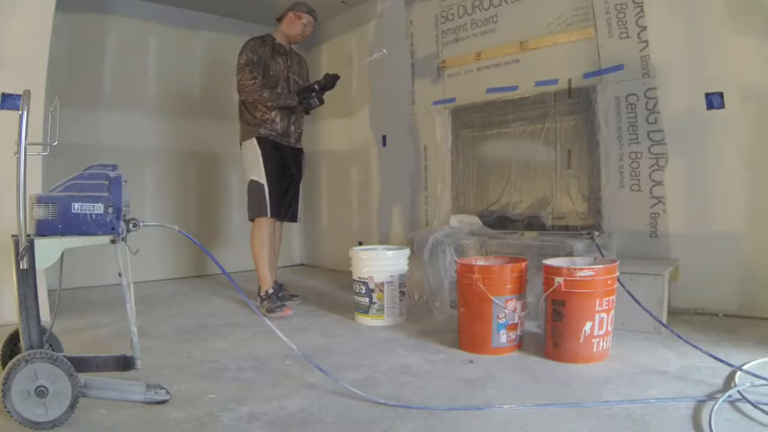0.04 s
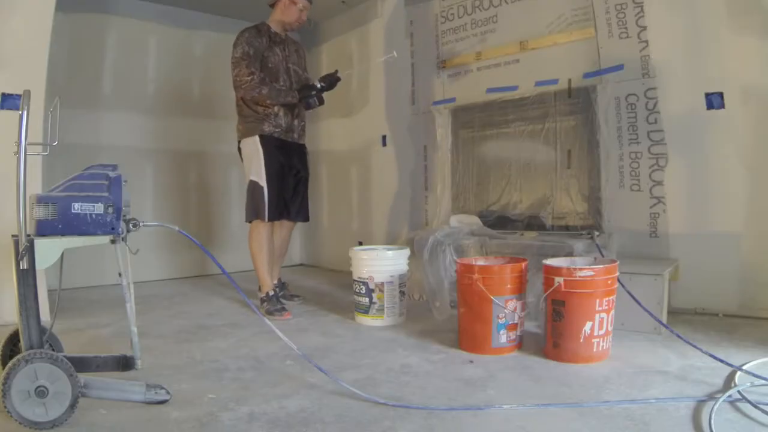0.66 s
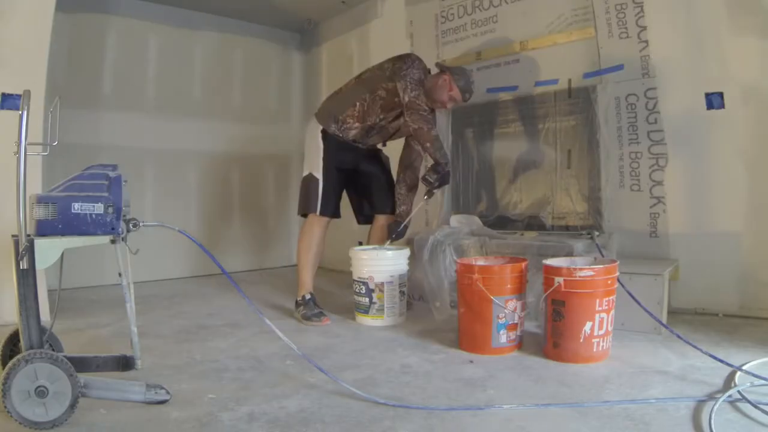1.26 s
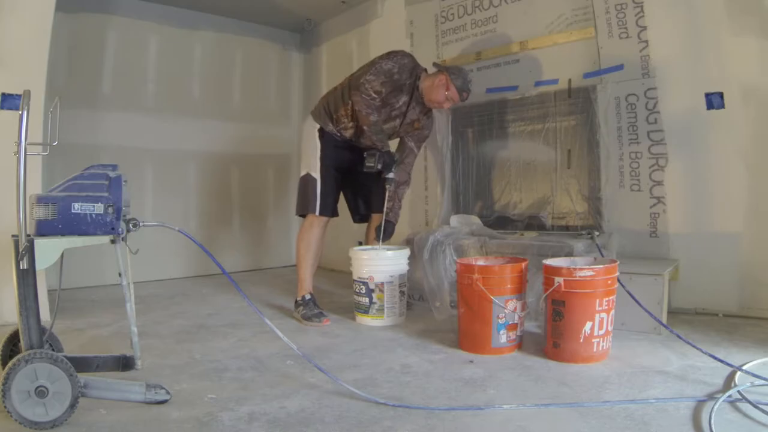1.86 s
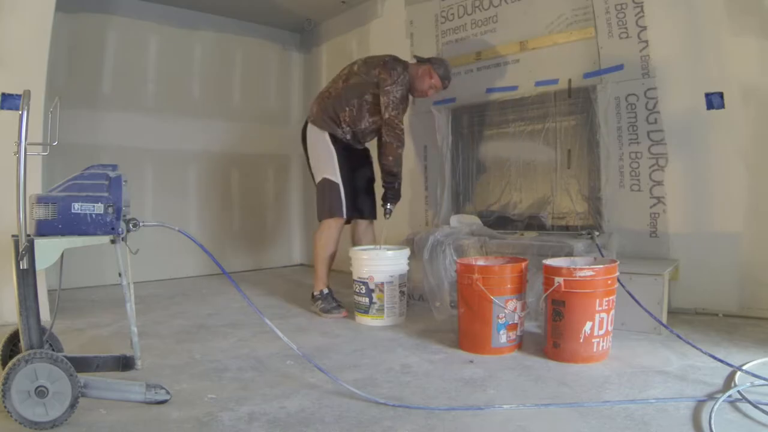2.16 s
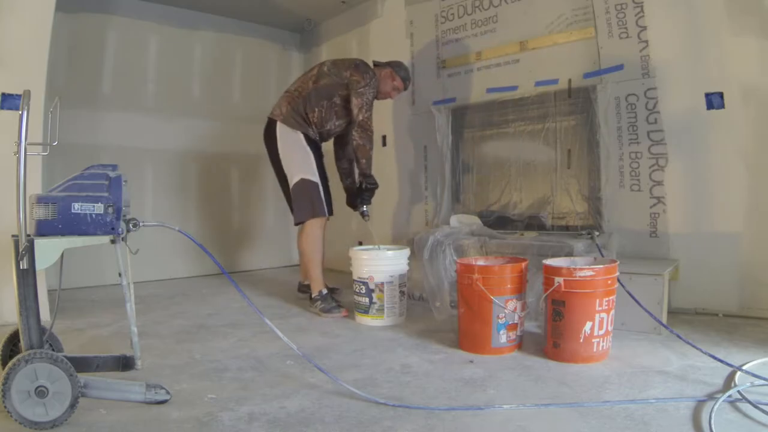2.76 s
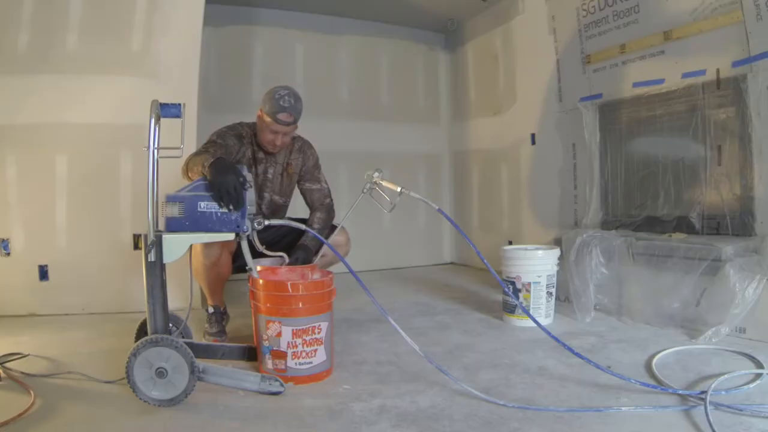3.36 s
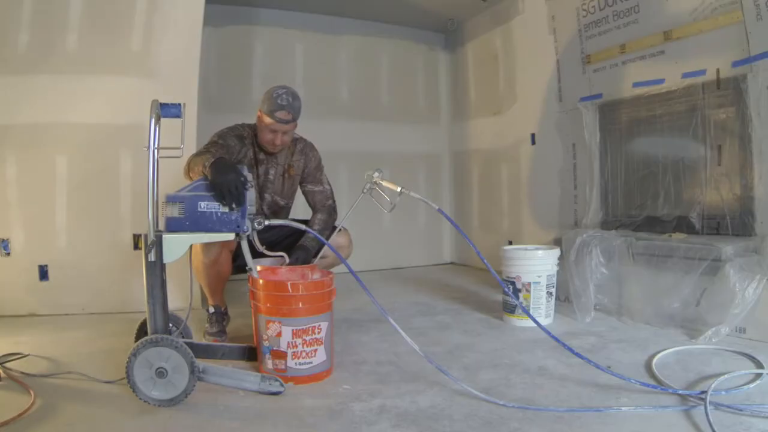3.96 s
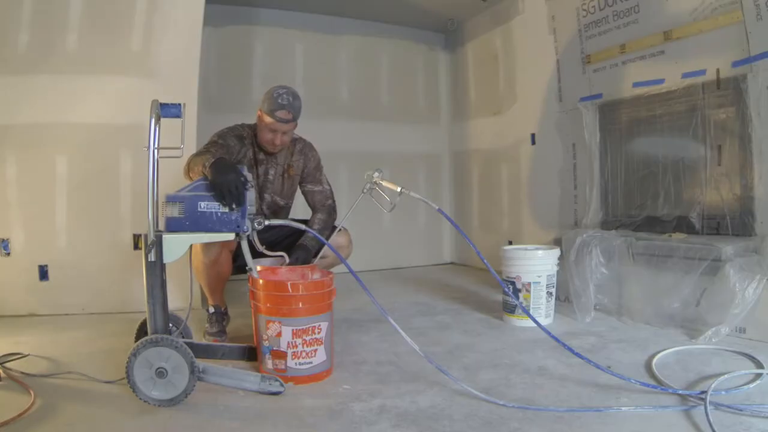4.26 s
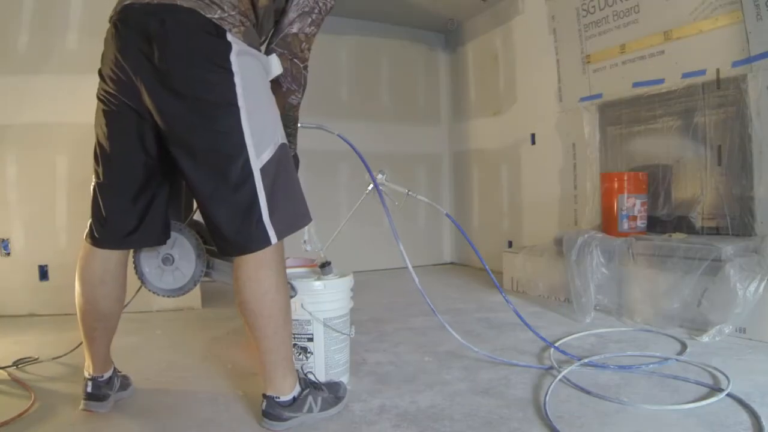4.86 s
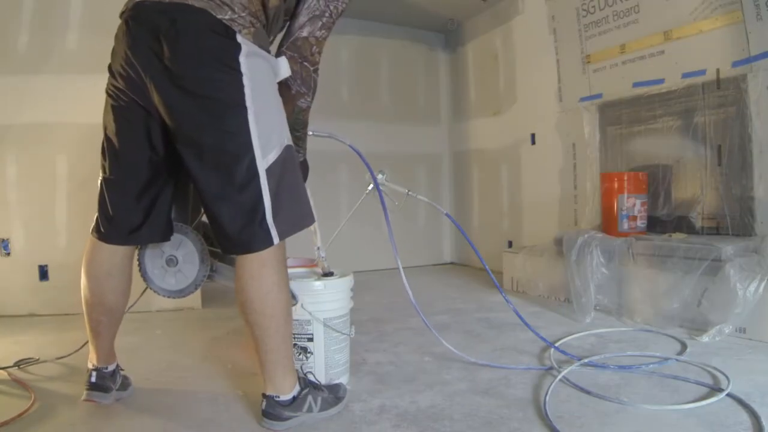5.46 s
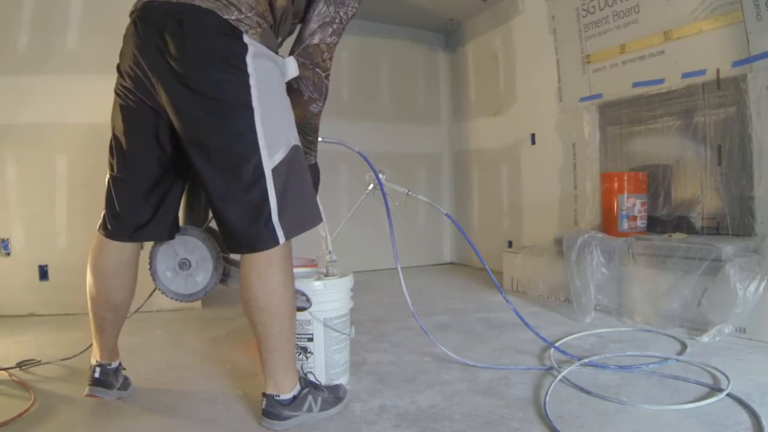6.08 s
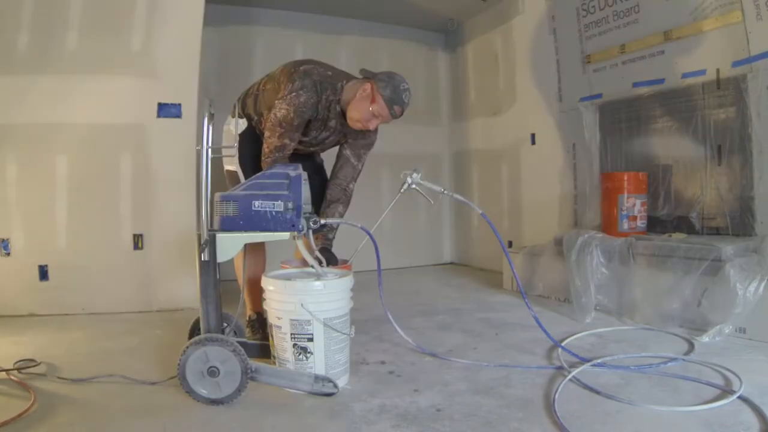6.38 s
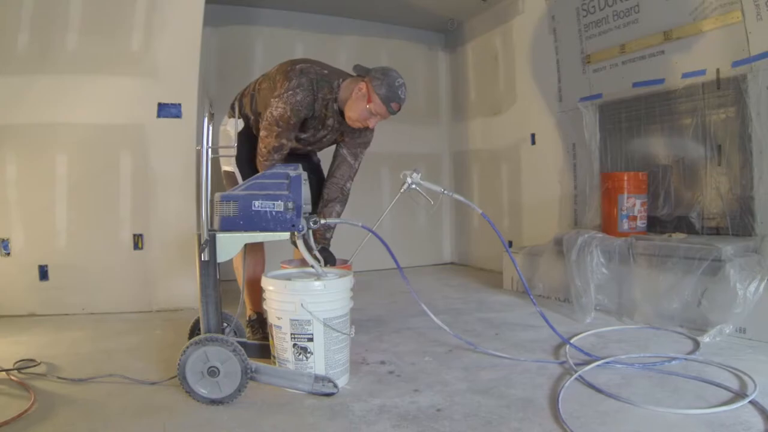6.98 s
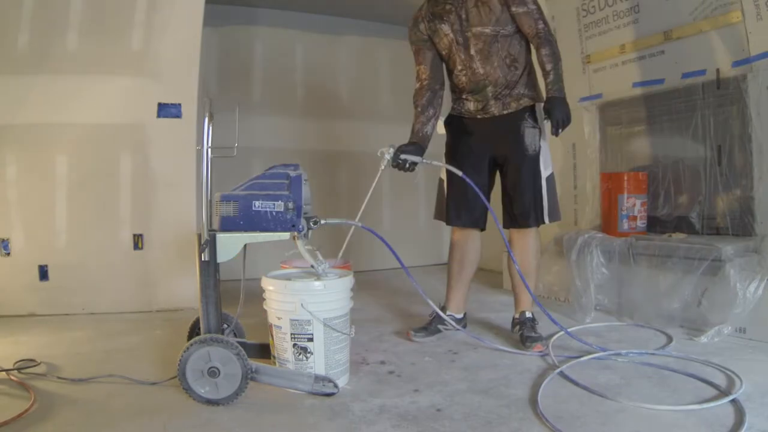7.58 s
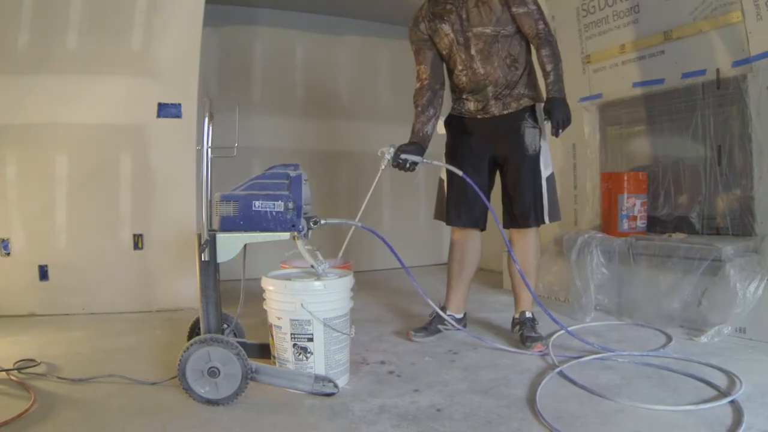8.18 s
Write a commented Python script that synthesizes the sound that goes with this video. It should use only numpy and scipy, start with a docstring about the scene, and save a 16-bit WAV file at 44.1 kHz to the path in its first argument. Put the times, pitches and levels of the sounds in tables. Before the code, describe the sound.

In a bare, echoing basement, a metal spray gun gives a gritty squeak and a sharp snap. Liquid spurts drum and splash into a plastic bucket, turning into a high whistle with hiss. An electric pump motor spins up and cuts off. The bucket scrapes and knocks on concrete. The motor returns with a falling gear whine, then crawls on unevenly. The microphone picks up clear room reflections.

```python
"""A metal spray gun clicks, squeaks and snaps in a bare basement: an airless paint sprayer is being
flushed, in short scenes that cut into one another. The jet drums and splashes in a plastic bucket and
whistles in the tip's orifice. The pump motor spins up, its brushes and gears rattling the casing. The
bucket is shoved and knocked about. Then rising pressure drags the motor down with a falling gear whine,
the power drops, and the motor crawls on."""
import sys
import numpy as np
from scipy import signal
from scipy.fft import rfft, irfft, next_fast_len
from scipy.io import wavfile

SR = 44100
rng = np.random.default_rng(int(sys.argv[2]) if len(sys.argv) > 2 else 0)


def wav_record(signal):
    """Record a signal, one row per channel, as 16-bit PCM in the file named by sys.argv[1]."""
    frames = np.transpose(np.atleast_2d(signal))
    bounded = np.clip(frames, -1, 1)
    # unit amplitude maps onto the largest positive 16-bit level
    quanta = np.round(bounded * 32767).astype(np.int16)
    wavfile.write(sys.argv[1], SR, quanta)


N = 362781
TIME = np.arange(N) / SR

# Start and end of each scene, in seconds.
GUN_SCENE, DRUM_SCENE, JET_SCENE = (0, 1.187), (1.44, 3.197), (2.097, 3.197)
SPIN_UP, BUCKET_SCENE, SLOW_DOWN, CRAWL = (3.556, 4.631), (4.631, 6.27), (6.252, 7.478), (7.478, 8.3)


def from_db(db):
    """Decibels to gain."""
    return np.exp(np.asarray(db) * (np.log(10) / 20))


def rms_one(x):
    """Scale to unit rms."""
    return x / np.sqrt(np.mean(x ** 2) + 1e-20)


def in_time(points):
    """A curve of (seconds, value) points, read at every sample."""
    return np.interp(TIME, *np.transpose(points))


def at_hz(points, hz):
    """Read a table on a log-frequency axis."""
    f, value = np.transpose(points)
    return np.interp(np.log(np.maximum(hz, 1)), np.log(f), value)


def phase_of(hz):
    """Running phase of a moving pitch, in radians."""
    return 2 * np.pi * np.cumsum(hz) / SR


def during(span, fade=0.001):
    """One inside a scene, zero outside."""
    return np.clip((TIME - span[0]) / fade, 0, 1) * np.clip((span[1] - TIME) / fade + 1, 0, 1)


def swell(start, rise, hold, db, fall_db_per_s):
    """Gain of one gesture: it rises, holds and dies away."""
    age = TIME - start
    attack = np.clip(age / max(rise, 1 / SR), 0, 1)
    return attack * from_db(db - fall_db_per_s * np.maximum(age - rise - hold, 0))


def together(gains):
    """Gains of overlapping gestures add in power."""
    return np.sqrt(sum(gain ** 2 for gain in gains))


def drift(rate):
    """Smooth random wander with spread 1 that changes about rate times a second."""
    step, settle = 40, 2000
    r = np.exp(-2 * np.pi * rate * step / SR)
    noise = rng.standard_normal(N // step + settle + 2)
    slow = signal.lfilter([1], [1, -2 * r, r * r], noise)[settle:]
    return np.interp(np.arange(N) / step, np.arange(len(slow)), rms_one(slow))


def shaped(x, spectrum, modes=()):
    """Filter by a broad tone curve with resonant humps."""
    size = next_fast_len(len(x))
    hz = np.arange(size // 2 + 1) * SR / size
    humps = sum(boost / (1 + (2 * (hz - f) / width) ** 2) for f, width, boost in modes)
    return irfft(rfft(x, size) * from_db(at_hz(spectrum, hz) + humps), size)[:len(x)]


def colour(x, spectrum, modes=()):
    """A shaped sound at unit rms."""
    return rms_one(shaped(x, spectrum, modes))


def band(x, low, high):
    """One band of a sound at unit rms."""
    return rms_one(signal.sosfilt(signal.butter(4, [low, high], "band", fs=SR, output="sos"), x))


def grains(per_s, spread_db):
    """Random tiny impacts of uneven size, at unit rms."""
    sizes = from_db(spread_db * np.minimum(rng.exponential(1, N), 4)) * rng.choice([-1, 1], N)
    return rms_one(sizes * (rng.random(N) < per_s / SR))


def taps(events, column=1):
    """One impulse for each event row, as strong as the dB in the chosen column."""
    out = np.zeros(N)
    for row in events:
        out[round(row[0] * SR)] = from_db(row[column])
    return out


def ring(x, modes):
    """Strike a set of decaying modes."""
    out = np.zeros(N)
    for hz, db, t60 in modes:
        r, w = from_db(-60 / (t60 * SR)), 2 * np.pi * hz / SR
        out += signal.lfilter([0, from_db(db) * np.sin(w)], [1, -2 * r * np.cos(w), r * r], x + 1e-18)
    return out


def basement(x, wet_db):
    """Direct sound plus a dense tail off concrete and plasterboard; the treble dies first."""
    # The room's decay. Each row: frequency in Hz, T60 in seconds.
    decay = [(200, 0.97), (1500, 1.0), (3200, 0.77), (6400, 0.71), (8500, 0.44), (11000, 0.37)]
    t, edges, tail = TIME[:SR], np.geomspace(60, 18000, 13), 0
    for low, high in zip(edges, edges[1:]):
        bandpass = signal.butter(2, [low, high], "band", fs=SR, output="sos")
        noise = signal.sosfilt(bandpass, rng.standard_normal(SR))
        tail = tail + noise * from_db(-60 * t / at_hz(decay, np.sqrt(low * high)))
    tail = rms_one(tail * np.minimum(t / 0.0072, 1)) / np.sqrt(SR)
    return x + from_db(wet_db) * signal.fftconvolve(x, tail)[:N]


def room_tone(level_db=-53.5):
    """The still basement: a faint, bass-heavy bed of noise."""
    # Tone of the air. Each row: frequency in Hz, relative level in dB.
    air_colour = [(12, -44), (20, -15.5), (76, -5), (153, -22.5), (175, -18), (266, -21.5), (298, -18.5),
                  (333, -24), (427, -22), (597, -22.5), (705, -20), (1130, -29), (11700, -47.5),
                  (14300, -47), (15500, -78)]
    return from_db(level_db) * colour(rng.standard_normal(N), air_colour)


def faint_noise_and_gun_slide(squeak_hz=4490, climb_hz=1200, climb_s=0.042, main_slide_s=0.539, squeak_db=-8):
    """A brief faint low noise, then metal slides on metal; its gritty squeak climbs as the main slide begins."""
    # A brief faint low noise at the very start, then the slides of the gun's parts. Each row: start in seconds,
    # hold in seconds, level in dB.
    gestures = [(0, 0.03, -52.5), (0.066, 0.065, -57.5), (0.52, .02, -52), (0.539, 0.061, -34),
                (0.6, .07, -32), (1.15, 0.033, -48)]
    # Tone of the grit. Each row: frequency in Hz, relative level in dB.
    grit_colour = [(120, -45.5), (200, -40), (378, -20), (462, -16.5), (1400, -2), (1620, -4.5), (2020, -2),
                   (2850, -9.5), (4100, -11.5), (13900, -29.5), (15500, -43)]
    envelope = together(swell(s, 0.0033, hold, db, fall_db_per_s=898) for s, hold, db in gestures)
    pitch = squeak_hz - climb_hz * np.exp(-np.maximum(TIME - main_slide_s, 0) / climb_s)
    squeak = from_db(squeak_db) * np.sin(phase_of(pitch * (1 + 0.0064 * drift(180))))
    grit = colour(grains(3000, 2), grit_colour)
    return basement(envelope * (grit + squeak), wet_db=-6)


def gun_clicks(crack_db=-8, crack_t60=0.071, snap_db=24):
    """Metal parts snap home; each contact is a short crack that sets the room ringing."""
    # Clicks of gun, switch and fittings. Each row: time in seconds, hit and spring strengths in dB.
    clicks = [(0.2297, -37.5, -41.5), (0.5442, -42, -48), (0.621, -23.5, -31.5), (0.6747, -8, -29.5),
              (3.5578, -24, -50), (5.6654, -29.5, -40.5), (7.481, -30, -34.5)]
    # Tone of a click. Each row: frequency in Hz, relative level in dB.
    click_colour = [(120, -41), (200, -39.5), (554, -20.5), (783, -21.5), (890, -13), (1620, -12.5),
                    (2130, -6.5), (4920, -15.5), (6020, -11), (12200, -18.5), (15500, -24)]
    # The gun body rings on, the trigger spring only clacks.
    # Each row: frequency in Hz, gain in dB, T60 in seconds.
    body_modes = [(2074, -19.5, 1), (2110, -35.5, .7), (2390, -28, .55)]
    spring_modes = [(3330, 4.5, 0.024), (3640, 8.5, 0.0065), (4300, 1, .008)]
    t, hits = TIME[:SR // 4], taps(clicks)
    crack = colour(rng.standard_normal(len(t)), click_colour) * from_db(crack_db - 60 * t / crack_t60)
    snaps = from_db(snap_db) * shaped(hits, click_colour)
    echoes = basement(snaps, wet_db=11) - snaps
    clacks = basement(ring(taps(clicks, column=2), spring_modes), wet_db=4)
    return signal.fftconvolve(hits, crack)[:N] + echoes + clacks + ring(hits, body_modes)


def jet_in_bucket(flutter_hz=32.43, churn=0.55):
    """The jet flutters as it digs into the liquid and beats on the bucket; drops splash on the wall."""
    # Bursts of the jet. Each row: start, rise and hold in seconds, drumming and splash levels in dB.
    bursts = [(1.442, .03, .01, -37, -42), (1.488, .005, 0.048, -25, -29.5), (1.62, 0.027, 0.049, -26, -41),
              (1.982, .006, 0.028, -36.5, -41), (2.094, 0.0026, .38, -22, -31)]
    # Tone of the drumming and of the splash. Each row: frequency in Hz, relative level in dB.
    drum_colour = [(70, -49), (100, -34), (145, -11), (220, -15), (290, -14), (380, -7), (470, -8.5),
                   (620, -18)]
    splash_colour = [(350, -56), (600, 4.5), (696, -9.5), (785, 0.5), (974, -3), (1400, -7.5), (1790, -16),
                     (7960, -42.5), (15000, -50)]
    # Resonances of the bucket with liquid in it. Each row: frequency in Hz, width in Hz, boost in dB.
    bucket_modes = [(130, 12, 8), (162, 14, 10), (182, 17, 4), (267, 19, 15), (331.3, 15, 12),
                    (357, 17, 11), (397.3, 17, 15.5), (836, 26, 6), (940, 53, -9), (1470, 180, 4.5)]
    drumming = together(swell(s, rise, hold, db, fall_db_per_s=73.5) for s, rise, hold, db, _ in bursts)
    splashing = together(swell(s, rise, hold, db, fall_db_per_s=54.5) for s, rise, hold, _, db in bursts)
    cycles = np.cumsum(flutter_hz * (1 + 0.039 * drift(12))) / SR
    count = np.floor(cycles - np.interp(JET_SCENE[0], TIME, cycles))   # a beat as the jet opens fully
    beats = rms_one(np.diff(count, prepend=count[0]) * from_db(2 * drift(35)))
    turbulence = churn * grains(970, 3.1)
    body = colour(basement(beats + turbulence, wet_db=0.5), drum_colour, bucket_modes)
    drops = grains(1600, 0.84) + 0.48 * beats
    splash = colour(basement(drops, wet_db=-0.5), splash_colour, bucket_modes)
    return (drumming * band(body, 89, 690) + splashing * band(splash, 590, 15000)) * during(DRUM_SCENE)


def spray_tip(whistle_hz=3335, rise_hz_per_s=24, flutter_hz=208, flutter_depth=0.43,
              faint_db=-36.5, side_tone_db=-50, hiss_db=-35.5):
    """Fluid whistles in the orifice, its fast flutter adds side tones, and the fan of drops hisses."""
    # The faint whistle catches fully. Each row: start in seconds, hold in seconds, level in dB.
    catches = [(2.067, 0.074, -29.5), (2.485, 0.028, -37), (2.65, .05, -33), (2.784, 0.095, -31.5)]
    # Steady tones of the pressurised gun and hose. Each row: frequency in Hz, level in dB.
    hose_tones = [(318, -58), (2202, -49), (4385, -63)]
    # Tone of the hiss. Each row: frequency in Hz, relative level in dB.
    hiss_colour = [(240, -52), (400, -20), (503, -22), (873, -12), (1690, -10.5), (2250, -10),
                   (2630, -11.5), (3250, -4), (4160, -10), (6000, -17.5), (6780, -14), (13700, -32.5),
                   (15500, -38)]
    pitch = whistle_hz + rise_hz_per_s * (TIME - JET_SCENE[0])
    phase = phase_of(pitch * (1 + 0.00146 * drift(50)))
    flutter = phase_of(flutter_hz * (1 + 0.018 * drift(12.6)))
    harmonics = np.sin(phase) + from_db(-16) * np.sin(2 * phase) + from_db(-28) * np.sin(3 * phase)
    tone = rms_one(basement(harmonics * (1 + flutter_depth * np.sin(flutter)), wet_db=-4))
    surges = [swell(s, 0.011, hold, db, fall_db_per_s=99) for s, hold, db in catches]
    whistle = together(surges + [from_db(faint_db)]) * tone
    lower_side_tone = from_db(side_tone_db) * np.cos(phase - flutter)
    hose = 0
    for hz, db in hose_tones:
        amplitude = np.sqrt(2) * from_db(db + 2 * drift(6.8))
        hose = hose + amplitude * np.sin(2 * np.pi * hz * TIME + 0.71 * drift(3))
    hiss = from_db(hiss_db) * colour(basement(grains(15000, 3.1), wet_db=-2.5), hiss_colour)
    return (whistle + lower_side_tone + hose + hiss) * during(JET_SCENE)


def pump(tooth_hz, noise_law, spectrum, modes, gear_db, octave_db, commutator_db, buzz_db,
         rattle_db, flare, wobble, coasting_s=0):
    """Brushes and gears rattle the casing over the fan's rush; noise, buzz and whine follow the speed."""
    # Fade rates once the power drops, in dB per second: rumble, casing, hiss.
    coast_fall = (28, 58, 81)
    # Buzz of the reduction shaft. Each row: multiple of its speed, relative level in dB.
    shaft_partials = [(3, -11), (5, -8), (6, -6.5), (10, 2), (15, -2), (16, 3)]
    # Gearbox resonances. Each row: frequency in Hz, width in Hz, boost in dB at a flare of 1.
    gearbox_modes = [(1250, 150, 5.5), (2370, 130, 6), (2660, 170, 8), (2950, 270, 12.5), (4380, 110, 2),
                     (4730, 130, 15.5), (5250, 250, 8.5), (6150, 350, 7)]
    gear_teeth, commutator_bars, shaft_ratio = 24, 32, 0.311
    working_hz, judder_hz = 3000, 1450   # tooth rates; below the second the whine breaks up
    octaves = np.log2(tooth_hz / working_hz)
    levels = [db + slope * octaves - fall * coasting_s
              for (db, slope), fall in zip(noise_law, coast_fall)]
    rotor = phase_of(tooth_hz * (1 + 0.00286 * drift(63))) / gear_teeth
    shaft = shaft_ratio * rotor
    # The reduction gear runs slightly out of round, so the teeth bite harder twice a turn.
    bite = from_db(rattle_db * (np.sin(2 * shaft) + 1.38 * drift(32)))
    rush = rng.standard_normal(N) + 0.75 * grains(2500, 3.7)
    casing = colour(basement(rush * bite, wet_db=-4.5), spectrum, modes)
    bands_hz = [(100, 600), (600, 4500), (4500, 17000)]   # rumble, casing, hiss
    noise = sum(from_db(level) * band(casing, *edges) for level, edges in zip(levels, bands_hz))
    buzz_gain = from_db(levels[0] + buzz_db + 14 * octaves + 2 * drift(9.1))
    buzz = buzz_gain * sum(from_db(db) * np.sin(k * shaft) for k, db in shaft_partials)
    # The mesh wobbles once a rotor turn; the slower the gears, the more they judder in their play.
    mesh = gear_teeth * rotor + wobble * np.sin(rotor + drift(21)) + judder_hz / tooth_hz * drift(148)
    mesh_tone = np.sin(mesh) + from_db(octave_db) * np.sin(2 * mesh)
    teeth = from_db(gear_db + 2 * drift(36)) * mesh_tone * bite
    commutator_gain = from_db(commutator_db + 24 * octaves + 2 * drift(30.8))
    commutator = commutator_gain * np.sin(commutator_bars * rotor)
    # The whine flares whenever it sweeps through a resonance of casing or gearbox.
    resonances = modes + [(hz, width, flare * boost) for hz, width, boost in gearbox_modes]
    whine = shaped(teeth + commutator, [(1, 0.013)], resonances) * from_db(-coast_fall[1] * coasting_s)
    return noise + buzz + basement(whine, wet_db=-5)


def motor_spinning_up(start_s=3.522, top_tooth_hz=4424, half_speed_s=0.236, fade_in_s=0.034):
    """The free motor climbs towards top speed, its torque falling as it gains pace."""
    # Rumble, casing and hiss. Each row: level in dB at working speed, dB gained per octave of speed.
    noise_law = [(-29.5, 7.1), (-23.5, 7.4), (-26.5, 9.5)]
    # Tone of the free motor. Each row: frequency in Hz, relative level in dB.
    spectrum = [(53, -62), (90, -15.5), (222, -4), (342, -6.5), (473, -5.5), (810, 0), (1250, -0.5),
                (1800, 5), (2090, 1.5), (3010, 3), (4160, -9), (4740, -7.5), (5750, -12), (13300, -22),
                (15500, -34)]
    # Casing resonances. Each row: frequency in Hz, width in Hz, boost in dB.
    modes = [(224, 85, 11.5), (339.5, 44, 14), (835, 190, 7), (1787, 130, 5.5), (2530, 220, 4.5),
             (3050, 140, 6), (3800, 180, 5), (4980, 100, 1), (6600, 210, 5), (7540, 270, 6),
             (11000, 310, 4), (13400, 700, 0.5)]
    age = np.maximum(TIME, SPIN_UP[0]) - start_s
    tooth_hz = top_tooth_hz * age / (age + half_speed_s)
    running = pump(tooth_hz, noise_law, spectrum, modes, gear_db=-33.5, octave_db=-5,
                   commutator_db=-37.5, buzz_db=-14, rattle_db=0.54, flare=0.6, wobble=0.55)
    return running * during(SPIN_UP) * np.clip((TIME - SPIN_UP[0]) / fade_in_s, 0, 1)


def bucket_handling(knock_db=-3, rest_rumble_db=-49, rest_rub_db=-50, rise_s=0.0034, fall_db_per_s=120):
    """The bucket rubs on the concrete in small slips, and the suction tube knocks against it."""
    # Shoves over the floor. Each row: start and hold in seconds, hollow rumble and rubbing levels in dB.
    shoves = [(4.62, 0.018, -54, -44), (4.782, 0.061, -37.5, -44.5), (5.02, 0.054, -28, -39),
              (5.275, 0.2, -40.5, -49), (5.794, 0.023, -41.5, -49.5), (5.91, 0.016, -43.5, -56),
              (6.082, .025, -45, -42), (6.16, 0.04, -29.5, -36.5)]
    # Tone of the scrape. Each row: frequency in Hz, relative level in dB.
    scrape_colour = [(41, -36), (70, -11), (224, 0), (260, -5), (296, -6), (337, -7), (455, -1.5),
                     (643, -18.5), (814, -18.5), (926, -20), (1170, -21.5), (2490, -37), (12000, -58),
                     (15600, -93), (22000, -120)]
    # Resonances of the scraping bucket. Each row: frequency in Hz, width in Hz, boost in dB.
    scrape_modes = [(230, 18, 3), (300, 40, 14.5), (398, 44, 5.5), (736, 96, 11), (1070, 49, 4.5)]
    # Knocks of the tube. Each row: time in seconds, strength in dB.
    tube_hits = [(4.778, -22.5), (5.024, -17), (5.349, -21.5), (5.419, -25), (5.802, -28.5), (6.16, -26.5)]
    # Ring of the wall and bottom. Each row: frequency in Hz, gain in dB, T60 in seconds.
    wall_modes = [(127, -18, 0.12), (160, -8.5, 0.08), (237.3, -10, 0.33), (292, -8, 0.22),
                  (389.5, -14, 0.28), (543, -35, 0.072), (728, -40, 0.2), (1177, -22, 0.13)]
    rumbles = [swell(s, rise_s, hold, db, fall_db_per_s) for s, hold, db, _ in shoves]
    rubs = [swell(s, rise_s, hold, db, fall_db_per_s) for s, hold, _, db in shoves]
    slips = colour(basement(grains(500, 0.6), wet_db=0.5), scrape_colour, scrape_modes)
    # The bucket keeps stirring between shoves.
    rumble = together([from_db(rest_rumble_db)] + rumbles) * band(slips, 87, 530)
    rub = together([from_db(rest_rub_db)] + rubs) * band(slips, 750, 16000)
    knocks = from_db(knock_db) * basement(ring(taps(tube_hits), wall_modes), wet_db=-2.5)
    return (rumble + rub + knocks) * during(BUCKET_SCENE)


def motor_under_load(power_off_s=7.298):
    """Building pressure drags the motor down until the power drops; then it crawls on against the load."""
    # Speed while slowing and while crawling. Each row: time in seconds, gear tooth rate in Hz.
    slowing_speed = [(6.255, 3963), (6.55, 3586), (6.93, 2359), (7.14, 1485), (7.29, 1139), (7.478, 996)]
    crawl_speed = [(7.49, 1164), (7.61, 895), (7.7, 1467), (7.8, 1967), (7.9, 2085), (8.02, 1745),
                   (8.21, 1382)]
    # Rumble, casing and hiss. Each row: level in dB at working speed, dB gained per octave of speed.
    slowing_noise = [(-31, 4.9), (-24, 4), (-30, 6.8)]
    crawl_noise = [(-26, 12.1), (-26.5, 2.6), (-28.5, 7.4)]
    # Tone of the labouring motor. Each row: frequency in Hz, relative level in dB.
    spectrum = [(53, -60), (90, -54), (133, -17.5), (259, -8), (473, 0), (562, -3.5), (793, -1.5),
                (1300, -5), (1800, -2.5), (2140, -2.5), (2890, -3.5), (4160, -17), (5060, -19.5),
                (11200, -32.5), (15500, -42.5)]
    # Casing resonances under load. Each row: frequency in Hz, width in Hz, boost in dB.
    modes = [(477, 8.4, 2.7), (767, 330, 6.5), (1079, 51, 6.7), (1410, 30, 9.3), (1760, 60, 1.8),
             (1825, 270, 7.9), (2340, 140, 3.1), (2610, 64, 6.7), (2810, 11, 1.5), (3720, 140, 5.3),
             (5200, 69, 1), (11300, 430, 3)]
    slowing = pump(in_time(slowing_speed), slowing_noise, spectrum, modes, gear_db=-32.5, octave_db=-25,
                   commutator_db=-54, buzz_db=-9, rattle_db=1.13, flare=1.05, wobble=0.8,
                   coasting_s=np.maximum(TIME - power_off_s, 0))
    crawling = pump(in_time(crawl_speed), crawl_noise, spectrum, modes, gear_db=-36, octave_db=-10.5,
                    commutator_db=-37, buzz_db=-11, rattle_db=1.5, flare=0.52, wobble=1.04)
    return slowing * during(SLOW_DOWN, fade=0.0045) + crawling * during(CRAWL, fade=0.0044)


def scene():
    """All the scenes in a row over the still room, the same in both channels."""
    air = room_tone()
    motor = motor_spinning_up() + motor_under_load()
    foley = (gun_clicks() + faint_noise_and_gun_slide()) * (during(GUN_SCENE) + during((SPIN_UP[0], CRAWL[1])))
    mono = air + foley + jet_in_bucket() + spray_tip() + motor + bucket_handling()
    return np.stack([mono, mono])


def record(dry):
    """A steep low-pass takes off the very top."""
    cutoff_hz = 15600
    return signal.sosfilt(signal.ellip(10, 0.2, 80, cutoff_hz, fs=SR, output="sos"), dry)


dry = scene()
out = record(dry)
wav_record(out)
```